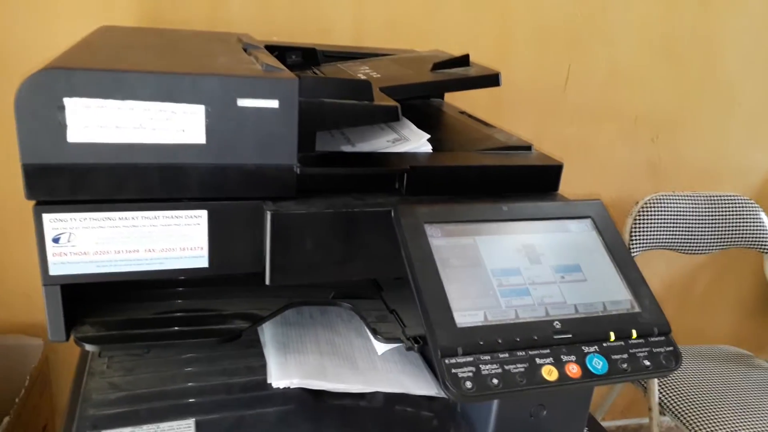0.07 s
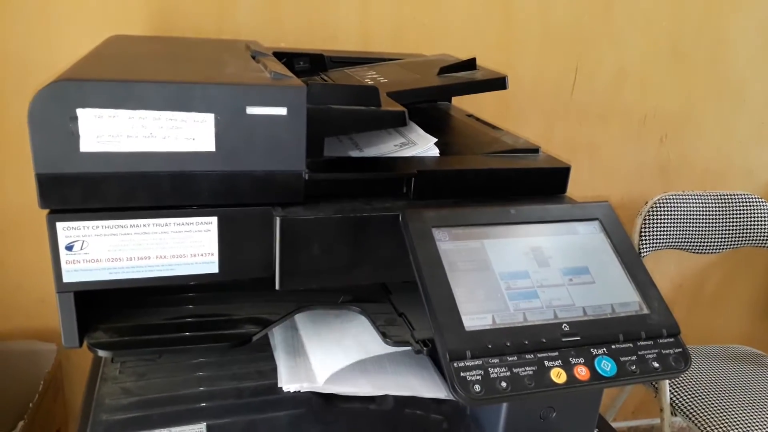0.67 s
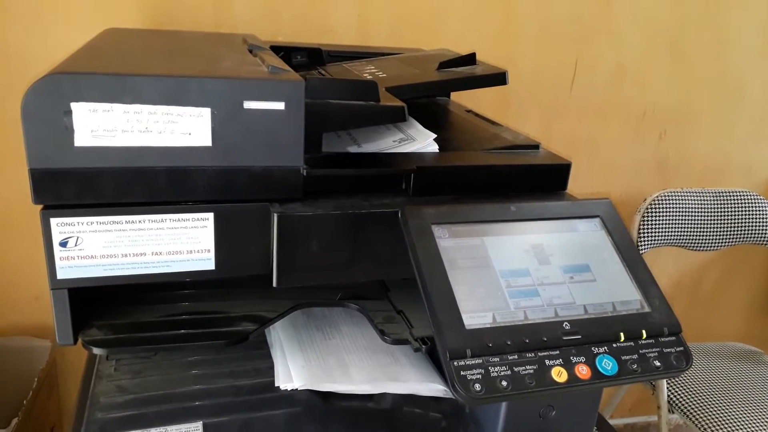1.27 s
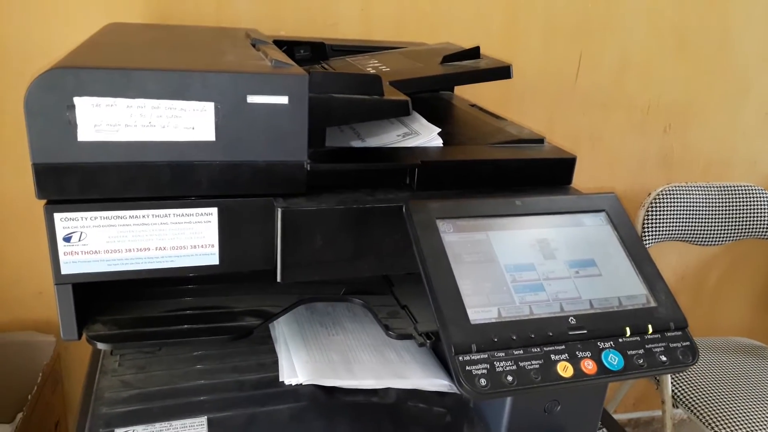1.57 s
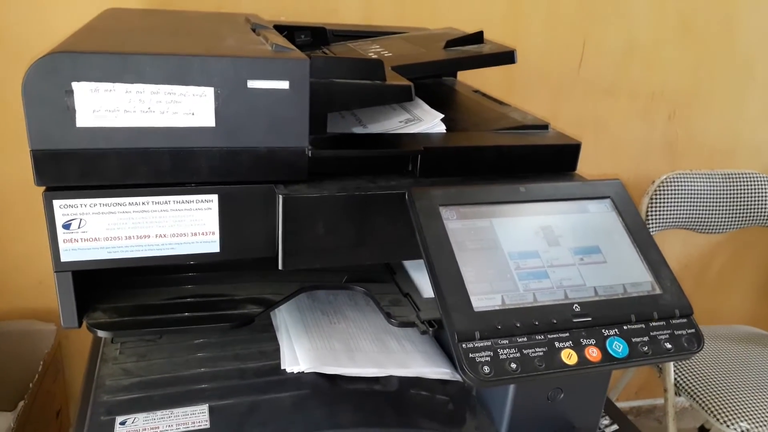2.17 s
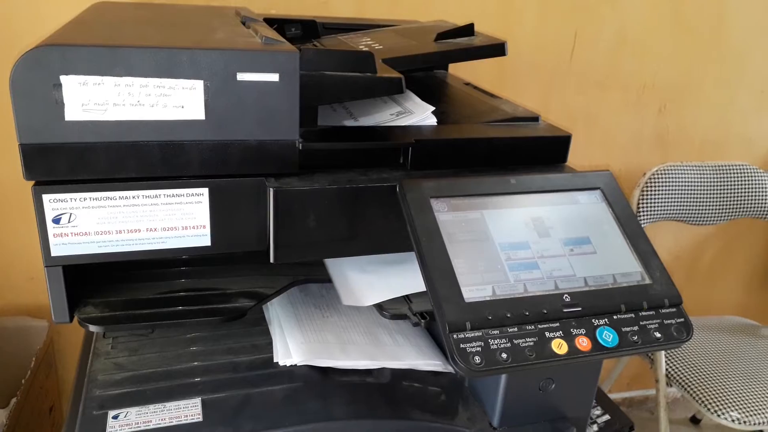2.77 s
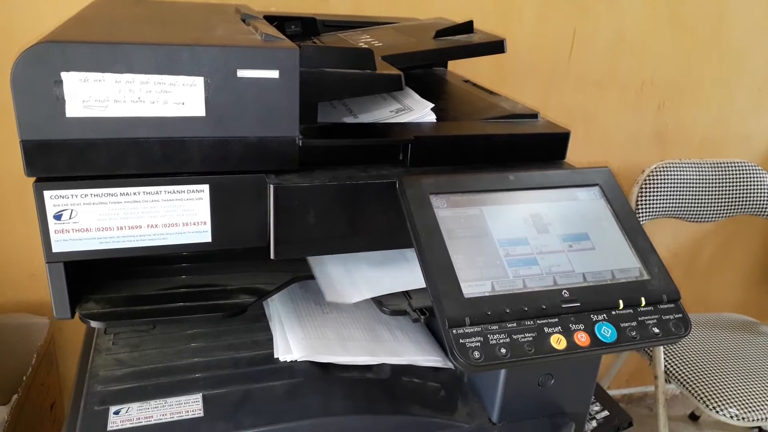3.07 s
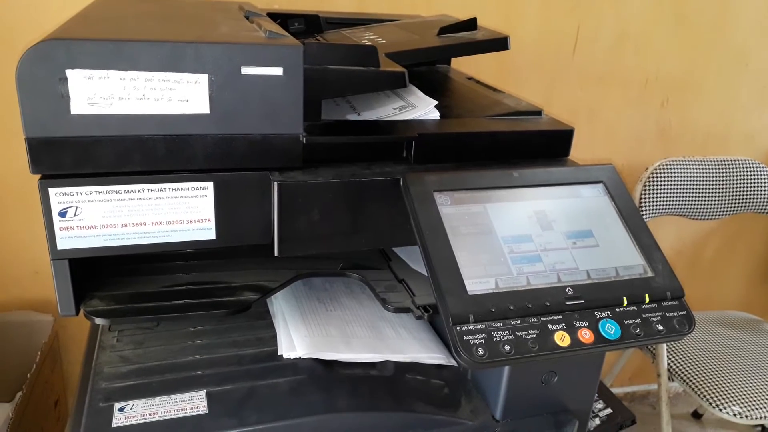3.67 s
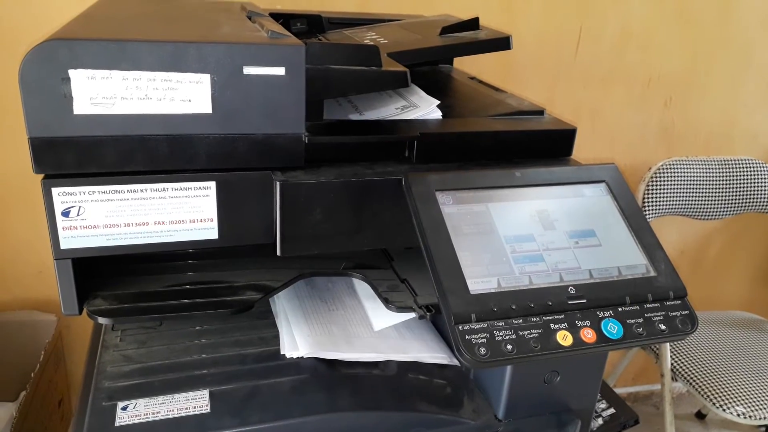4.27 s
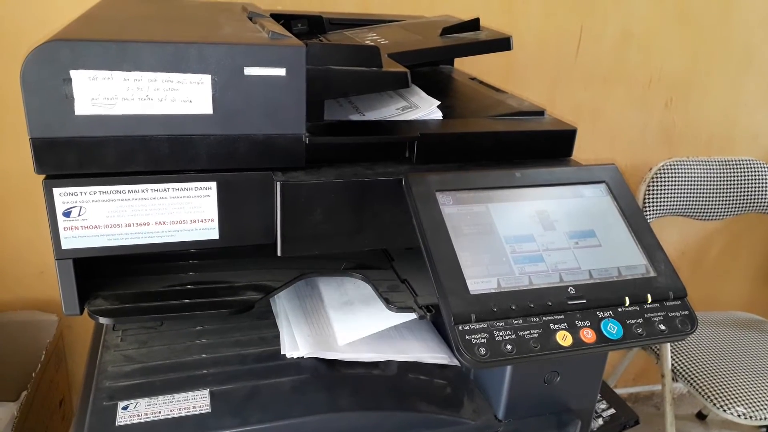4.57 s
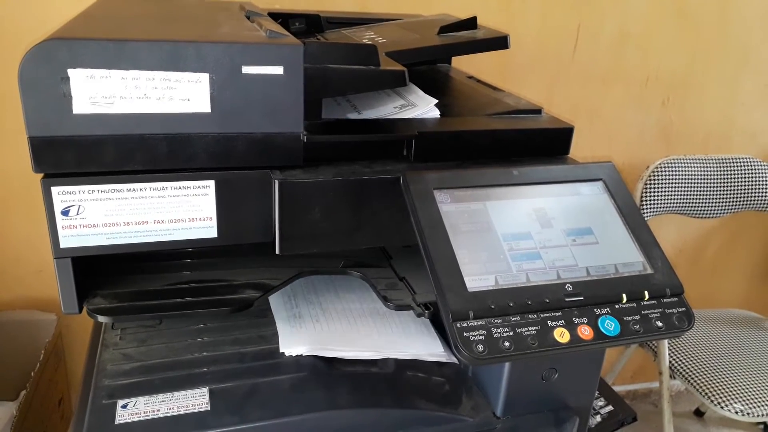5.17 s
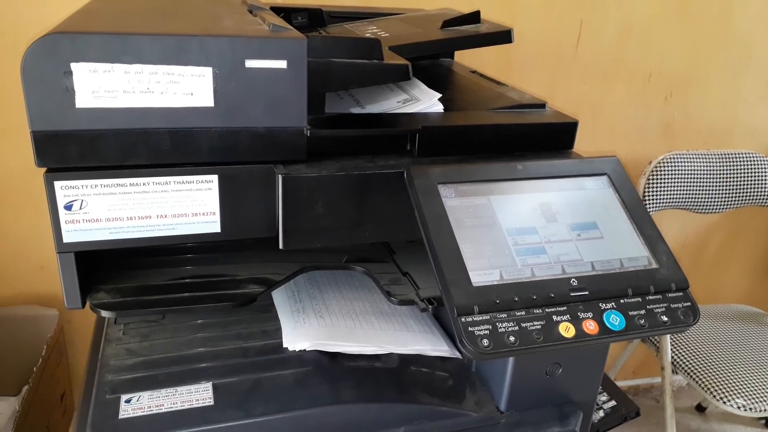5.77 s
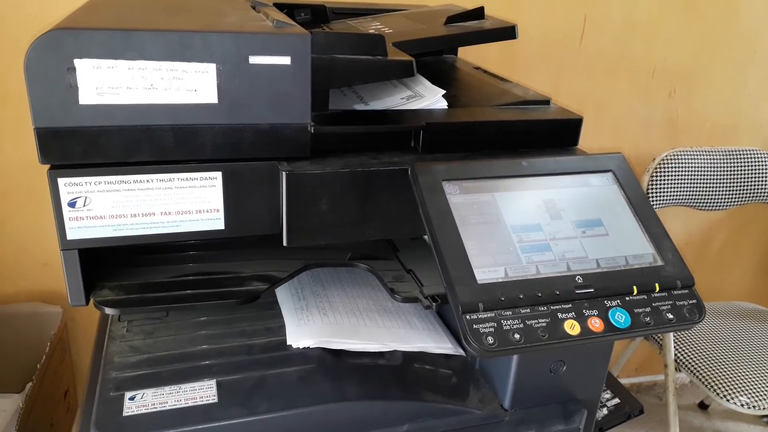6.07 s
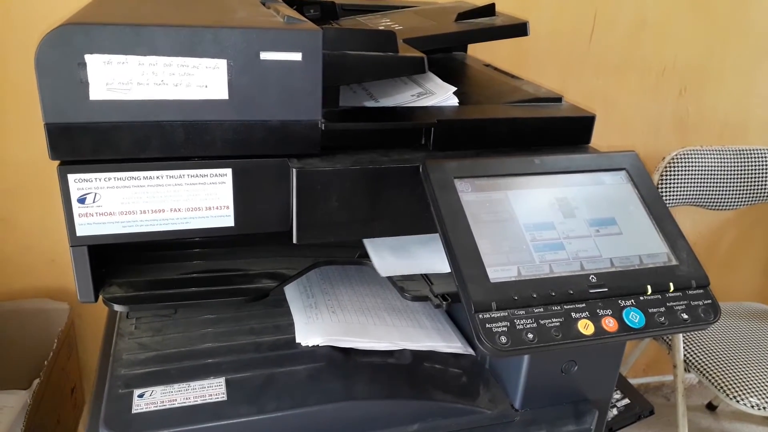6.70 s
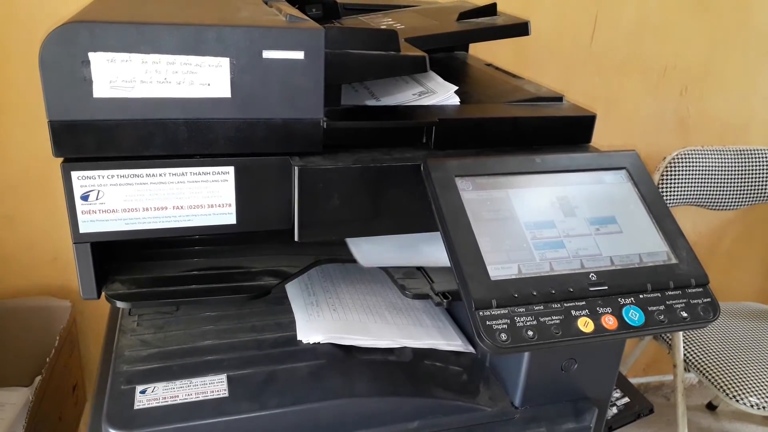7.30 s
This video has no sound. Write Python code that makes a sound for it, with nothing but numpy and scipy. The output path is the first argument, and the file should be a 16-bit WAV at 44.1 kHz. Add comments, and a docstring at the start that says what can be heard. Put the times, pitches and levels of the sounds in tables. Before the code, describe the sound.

An office photocopier whirs and hums, hissing sheets through with a sharp clack about every two seconds.

```python
"""Humming fans and churning gears fill a small room as an office photocopier prints sheet after sheet.
Stepper motors sing at their step rates, and sliding friction makes each sheet hiss along its guides.
About every two seconds a solenoid throws the paper gate: the impact excites its modes in a sharp clack.
In between, paper edges tick against the guides. The sound is mono, as heard from a metre away."""
import sys
import numpy as np
from scipy import signal
from scipy.fft import rfft, irfft, next_fast_len
from scipy.io import wavfile
from scipy.ndimage import map_coordinates

SR = 44100
rng = np.random.default_rng(int(sys.argv[2]) if len(sys.argv) > 2 else 0)


def store_pcm(level_fs):
    """Save levels as 16-bit WAV."""
    pcm = np.round(np.clip(level_fs, -1, 1) * 32767).astype(np.int16)
    wavfile.write(sys.argv[1], SR, np.atleast_2d(pcm).T)


N = 328104

CYCLE_S = 4.074  # period of one two-sided sheet
IDLE_HISS_DB = -49
CHATTER_S = .004  # interval between the contacts of one gate landing
# Throws of the gate. Each row: landing in seconds, level, thump and crack in dB, stroke duration in
# seconds, loss per chatter contact in dB, first rebound's flight in seconds, rebound gain in dB.
GATE_THROWS = [(1.0120, -12.5, -17, 2.5, 0.018, 5.5, 0.091, -19),
               (3.0720, -14, 2.5, 0, 0.015, 2, 0.021, -12), (5.08, -15, -6, 6, .02, 3.5, .09, -18),
               (7.1283, -14, 2.5, -0.5, 0.017, 1, 0.02, -14)]


def amp(db):
    """Amplitude grows tenfold for every 20 dB."""
    return 10 ** (np.asarray(db) / 20)


def unit(x):
    """Normalisation to an rms of 1."""
    return x / np.sqrt(np.mean(x ** 2) + 1e-20)


def along(points, hz):
    """Interpolation of (Hz, value) points on a logarithmic frequency axis."""
    f, v = np.transpose(points)
    return np.interp(np.log(hz + 1), np.log(f + 1), v)


def wobble(rate):
    """Smooth random modulation with rate knots a second."""
    return map_coordinates(rng.standard_normal(int(N * rate / SR) + 4), [np.arange(N) * rate / SR])


def filtered(x, response):
    """Linear filtering: the spectrum of x times a frequency response."""
    size = next_fast_len(N + SR // 2)
    return irfft(rfft(x, size) * response(np.fft.rfftfreq(size, 1 / SR)), size)[:N]


def coloured(x, spectrum):
    """Spectral shaping by (Hz, relative dB) points, at an rms of 1."""
    return unit(filtered(x, lambda hz: amp(along(spectrum, hz))))


def noise(spectrum):
    """Gaussian noise shaped to a spectrum."""
    return coloured(rng.standard_normal(N), spectrum)


def tone(hz, drift, flutter_db):
    """An unsteady rotor modulates its tone in frequency and amplitude; the rms is 1."""
    phase = 2 * np.pi * np.cumsum(hz * (1 + drift * wobble(9))) / SR
    return unit(np.sin(phase) * amp(flutter_db * wobble(12)))


def add(track, s, sound):
    """Superposition of a sound on the track at s seconds."""
    part = track[round(s * SR):][:len(sound)]
    part += sound[:len(part)]


def highpass(x, edge_hz):
    """Attenuation by 24 dB an octave below the edge."""
    return signal.sosfilt(signal.butter(4, edge_hz, "highpass", fs=SR, output="sos"), x)


def each_sheet():
    """Periodic feed: cycle time in seconds, one row each for the previous, first and second sheet."""
    return np.arange(N) / SR - CYCLE_S * np.arange(-1, 2)[:, None]


def running(t, start, end, ramp_s):
    """A trapezoidal envelope, at half height at start and end."""
    return np.clip(.5 + np.minimum(t - start, end - t) / ramp_s, 0, 1)


def room(x):
    """Reverberation: cabinet and walls return a diffuse tail whose treble dies first."""
    # Each row: frequency in Hz, reverberation time in seconds.
    decay_times = [(150, 0.68), (1000, 0.54), (6000, 0.46), (15000, 0.31)]
    hz, t, spectra = signal.stft(rng.standard_normal(SR // 2), SR, nperseg=256)
    t60 = np.maximum(along(decay_times, hz), .02)[:, None]
    tail = signal.istft(spectra * amp(-60 * t / t60), SR, nperseg=256)[1]
    response = np.pad(tail / np.linalg.norm(tail), (SR // 200, 0))  # arrives 5 ms late
    return signal.fftconvolve(x, response)[:N]


def fans():
    """Periodic blade passage gives tones; turbulence in the hollow cabinet gives broadband noise."""
    # Each row: blade tone in Hz, level in dB.
    blade_tones = [(376, -46.5), (397, -58.5), (148.7, -64)]
    # Cabinet air. Each row: frequency in Hz, relative spectral density in dB.
    air_spectrum = [(20, -50), (38, -39), (54, -12.5), (65, -23), (80, -8.5), (110, -11), (152, -8),
                    (171, 1), (200, -4), (255, -1), (330, -4.5), (450, -13), (900, -18), (3000, -56)]
    blades = sum(amp(db) * tone(hz, drift=0.0008, flutter_db=1.6) for hz, db in blade_tones)
    return blades + amp(-45 + 2 * wobble(14)) * noise(air_spectrum)


def drive(drag_db):
    """Dense tooth impacts merge into noise that grows with load; the rotating parts add tones."""
    # Rollers grip the sheet and the gears labour. Each row: cycle time in seconds, swell in dB.
    grips = [(.44, 3.3), (1.24, 2.5), (2.52, 2.7), (3.65, 3), (3.95, 2)]
    # Gear train. Each row: frequency in Hz, relative spectral density in dB.
    gear_spectrum = [(150, -20), (450, 0), (700, 0.5), (1000, 0.5), (1350, 1.5), (1900, 0), (2400, -5),
                     (2900, -21), (4200, -24.5), (5400, -18), (7300, -22.5), (9700, -30), (11000, -24),
                     (16000, -35)]
    # Main motor, plus a steady tone an octave above the reverse step rate; then the fast-turning parts. Each
    # row: frequency in Hz, level in dB.
    motor_tones = [(718.7, -56.5), (751, -60.5), (1787, -57)]
    whine_tones = [(5385, -62), (7294, -67), (7569, -73), (8624, -69.5), (13937, -75)]
    idle_db, db_per_drag_db, grip_s = -43.5, 0.094, 0.042
    t = each_sheet()
    grip_db = sum(db * np.exp(-((t - s) / grip_s) ** 2) for s, db in grips).sum(axis=0)
    load_db = idle_db + db_per_drag_db * (drag_db - IDLE_HISS_DB) + grip_db
    teeth = rng.standard_normal(N) * amp(1.36 * wobble(500))
    churn = amp(load_db + 2.2 * wobble(22)) * coloured(teeth, gear_spectrum)
    motor = sum(amp(db) * tone(hz, drift=0.00043, flutter_db=3) for hz, db in motor_tones)
    whine = sum(amp(db) * unit(tone(hz, drift=0.00199, flutter_db=1.5) * (1 + wobble(90)))
                for hz, db in whine_tones)  # roughened by the teeth
    return churn + motor + whine


def steppers():
    """The exit motor radiates at its step rate, lower drawing a sheet out than pulling it back."""
    # Forward moves. Each row: start and end in seconds of the cycle, mid-move level in dB.
    forward_moves = [(1.29, 1.64, -50.5), (1.65, 2.06, -45.5), (2.082, 2.93, -47)]
    # Reverse moves. Each row: start and end in seconds of the scene, mid-move level in dB.
    reverse_moves = [(-.2, .14, -47), (.32, 0.824, -47), (3.11, 3.42, -48.5), (3.46, 4.04, -47.5),
                     (4.08, 4.848, -52.5), (7.2, 7.55, -46.5)]
    forward_hz, reverse_hz, swell_db = 861.8, 893.3, 3

    def envelope(t, moves):
        """Each move swells to its middle, then fades."""
        total = 0
        for start, end, db in moves:
            off_centre = 2 * (t - start) / (end - start) - 1
            total += running(t, start, end, ramp_s=.06) * amp(db - swell_db * off_centre ** 2)
        return total

    forward = envelope(each_sheet(), forward_moves).sum(axis=0)
    reverse = envelope(np.arange(N) / SR, reverse_moves)
    return (forward * tone(forward_hz, drift=0.0014, flutter_db=1.5)
            + reverse * tone(reverse_hz, drift=0.00067, flutter_db=1.5))


def paper_drag():
    """Incoherent sources add in power: the friction level in dB of all passes plus an idle hiss."""
    # The sheet meets the guides, runs out, turns, is drawn back and leaves.
    # Each row: start and end in seconds of the cycle, level in dB, slope in dB per second.
    passes = [(1.48, 1.59, -48.5, 5), (1.695, 2.873, -41.5, 0.55), (3.078, 3.46, -51.5, -2),
              (3.462, 4.402, -44.5, -2.5), (4.4, 4.85, -51, -6)]
    t = each_sheet()
    power = sum(running(t, start, end, ramp_s=0.08) * amp(db + slope * (t - start)) ** 2
                for start, end, db, slope in passes)
    return 10 * np.log10(amp(IDLE_HISS_DB) ** 2 + power.sum(axis=0))


def paper_hiss(drag_db):
    """Sliding friction: fibres catch on the ribs, and the narrow paper path resonates with the hiss."""
    # Path resonances. Each row: centre and width in Hz, added gain as an amplitude ratio.
    resonances = [(5320, 130, 0.27), (7400, 160, .2), (8450, 180, 0.18)]
    # Paper on plastic ribs. Each row: frequency in Hz, relative spectral density in dB.
    hiss_spectrum = [(300, -20), (1100, 1.5), (2300, 2), (3100, -1), (4200, -9), (5400, 0.5), (7200, -1.5),
                     (8100, -6.5), (8700, -4.5), (9700, -12.5), (10900, -7.5), (12200, -15.5),
                     (15500, -11.5)]
    fibres = rng.standard_normal(N) * amp(0.72 * wobble(900))
    ducted = filtered(fibres, lambda f: 1 + sum(gain / (1 + (2 * (f - hz) / width) ** 2)
                                                for hz, width, gain in resonances))
    return amp(drag_db + 0.37 * wobble(45)) * coloured(ducted, hiss_spectrum)


def paper_ticks():
    """Impact transients: a sheet's edge snaps brightly on a guide, which gives a longer, dull knock."""
    # Each row: cycle time in seconds, then relative level, knock gain and second-sheet gain in dB.
    strikes = [(.1737, -27.5, -10, -14), (0.403, -29.5, -0.5, -1), (.645, -36.5, 3, 2),
               (.6749, -32.5, -8, -19), (0.74, -36.5, 2, -13), (0.818, -33.5, -8, -22),
               (1.18, -33, 1, -1.5), (1.196, -30.5, -6, 1), (2.387, -34.5, 4.5, 1),
               (2.867, -21.5, -3.5, -5.5), (3.0131, -37, 5, -2), (3.452, -32, 0.5, 0), (3.6267, -38, 5, 0),
               (4.0873, -34.5, 0, 0)]
    snap_t60_s, sizzle_db, sizzle_growth = 0.049, -36, 0.46
    snap, knock, sizzle = np.zeros((3, N))
    t = np.arange(SR // 4) / SR
    fade = amp(-60 * t / snap_t60_s)
    sharp = fade * (1 - np.exp(-t / 0.00063))
    blunt = fade ** 0.59 * (1 - np.exp(-t / 0.0031))
    for sheet in range(2):
        for cycle_s, level_db, knock_db, change_db in strikes:
            s, db = cycle_s + sheet * CYCLE_S, level_db + sheet * change_db
            add(snap, s, amp(db) * sharp)
            add(sizzle, s, amp(sizzle_db + sizzle_growth * db) * sharp)
            add(knock, s, amp(db + knock_db) * blunt)
    bright = noise([(1500, -13), (3000, -0.5), (4200, -6), (5600, 4.5), (8500, -2.5), (9600, -7.5),
                    (11000, -6), (13000, -27)])
    top = noise([(9000, -30), (11500, -4), (14000, 0), (16000, -5)])
    dull = noise([(150, -33), (700, -4), (1400, 4), (2400, 5), (3500, -11), (7000, -40)])
    return amp(-3.5) * snap * bright + amp(4) * sizzle * top + amp(0.5) * knock * dull


def armature():
    """Sliding friction: the solenoid's plunger scrapes its sleeve, easing off until the gate lands."""
    scrape_db, t60_s = -27.5, 0.35
    friction = np.zeros(N)
    for s, _, _, _, stroke_s, *_ in GATE_THROWS:
        t = np.arange(round((stroke_s + CHATTER_S) * SR)) / SR
        add(friction, s - stroke_s, amp(scrape_db - 60 * t / t60_s) * (1 - np.exp(-t / 0.0013)))
    return friction * noise([(100, 3.5), (400, -6.5), (1200, 2), (2400, 2.5), (3200, -9), (4300, -12),
                             (6500, -8.5), (9500, -20), (16000, -25)])


def gate_contacts(count=3):
    """Inelastic collisions: after a latch click, the gate chatters and rebounds in ever shorter hops."""
    chatter_dulling_db, rebound_dulling_db = 2.5, 4
    restitution, fade_db_per_s = .8, 110
    contacts = []  # Each row: time in seconds, then level, thump and crack in dB.
    for s, db, thump_db, crack_db, _, loss_db, flight_s, rebound_db in GATE_THROWS:
        contacts.append((s - .035, -41, -11, 8))  # the latch
        for k in range(count):
            contacts.append((s + k * CHATTER_S, db - k * loss_db, thump_db,
                             crack_db - k * chatter_dulling_db))
        for after_s in np.cumsum(flight_s * restitution ** np.arange(count)):
            hop_db = db + rebound_db - fade_db_per_s * (after_s - flight_s)
            contacts.append((s + after_s, hop_db, thump_db, crack_db - rebound_dulling_db))
    return contacts


def gate():
    """Impact excitation: each contact rings damped modes, cracks briefly and shakes loose parts."""
    # Gate and frame modes. Each row: frequency in Hz, relative level in dB, 60 dB decay time in seconds.
    modes = [(153, -13, 0.12), (270, -19.5, 0.064), (488, -8.5, 0.053), (841, -4.5, 0.036),
             (1106, -4, 0.02), (1258, -0.5, 0.032), (1527, -7, 0.033), (1853, -6.5, 0.034),
             (2183, -6, 0.044), (2420, -3, 0.042), (3185, -10.5, 0.031)]
    # The crack of plastic on metal, its top treble, and the rattle of loose panels and rollers.
    # Each row: frequency in Hz, relative spectral density in dB.
    crack_spectrum = [(100, -27), (600, -15), (1200, 9), (2500, -9.5), (2900, -2.5), (4300, -11),
                      (5600, 1.5), (7000, 1), (8700, -6), (9800, -10.5), (16000, -32)]
    treble_spectrum = [(4000, -29), (8000, -21), (11000, 5), (13000, -1), (16000, -0.5)]
    rattle_spectrum = [(60, -32), (130, 5), (300, 3.5), (600, -1), (1200, 2), (2300, -2.5), (3100, -9),
                       (4400, -9), (6500, -11.5), (8700, -12.5), (10000, -18), (16000, -33)]
    crack_t60_s, treble_t60_s, rattle_t60_s = 0.039, 0.023, 0.41
    ringing, crack_power, treble_power, rattle_power = np.zeros((4, N))
    t = np.arange(SR // 2) / SR
    hz, mode_db, t60 = np.transpose(modes)[:, :, None]
    thump_share = 1 / (1 + (hz / 950) ** 8)  # thump gain raises or lowers mainly the modes below 950 Hz
    mode_rise = 1 - np.exp(-(t * hz) ** 2)  # each mode builds up over about one cycle
    rattle_rise = 1 - np.exp(-t / 0.0042)
    for s, db, thump_db, crack_db in gate_contacts():
        # each contact point shifts the modes a little
        strength = amp(mode_db + thump_share * thump_db + 0.76 * rng.standard_normal(hz.shape))
        pitch = hz * (1 + 0.018 * rng.standard_normal(hz.shape))
        partials = strength * amp(-60 * t / t60) * np.sin(2 * np.pi * (pitch * t + rng.random(hz.shape)))
        add(ringing, s, amp(db - 3) * (partials * mode_rise).sum(axis=0))
        # the noisy parts of successive contacts add in power
        add(crack_power, s, amp(db + crack_db - 4.5 - 60 * t / crack_t60_s) ** 2)
        add(treble_power, s, amp(db + crack_db - 9 - 60 * t / treble_t60_s) ** 2)
        add(rattle_power, s, (amp(db - 18 - 60 * t / rattle_t60_s) * rattle_rise) ** 2)
    grains = rng.standard_normal(N) * amp(2.5 * wobble(350))
    rattle = np.sqrt(rattle_power) * coloured(grains, rattle_spectrum)
    crack = np.sqrt(crack_power) * noise(crack_spectrum)
    treble = np.sqrt(treble_power) * noise(treble_spectrum)
    return ringing + crack + treble + rattle


def scene():
    """Superposition of the running machine, its blows and their reverberation, alike in both channels."""
    blows = highpass(armature() + gate() + paper_ticks(), edge_hz=117)  # the blows carry little deep bass
    drag_db = paper_drag()
    mono = fans() + drive(drag_db) + steppers() + paper_hiss(drag_db) + blows + amp(-13) * room(blows)
    return np.array([mono, mono])


def record(dry):
    """Soft saturation rounds the peaks; band limiting removes the deep bass and the highest treble."""
    ceiling, bass_hz, top_hz = .5, 53, 15700
    rounded = dry / (1 + (dry / ceiling) ** 4) ** (1 / 4)
    return np.array([filtered(channel, lambda hz: hz < top_hz) for channel in highpass(rounded, bass_hz)])


dry = scene()
out = record(dry)
store_pcm(out)
```